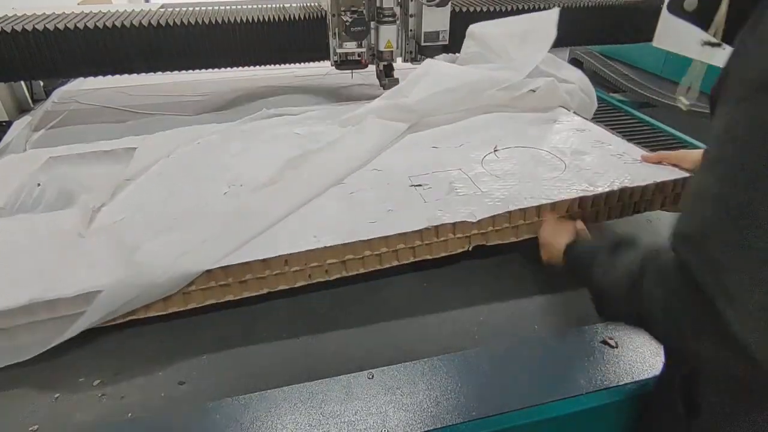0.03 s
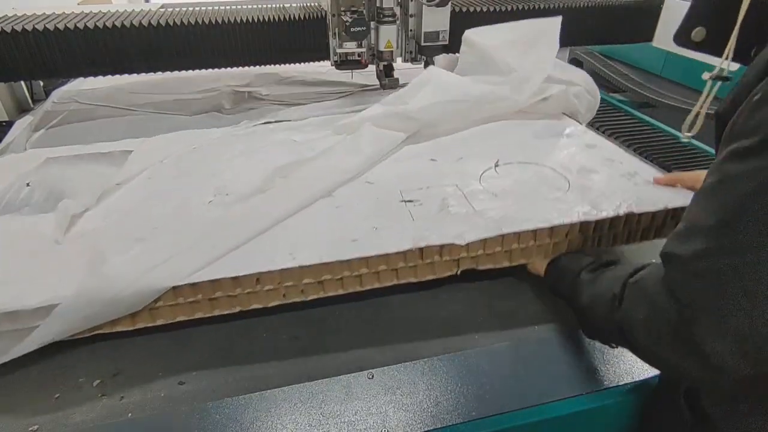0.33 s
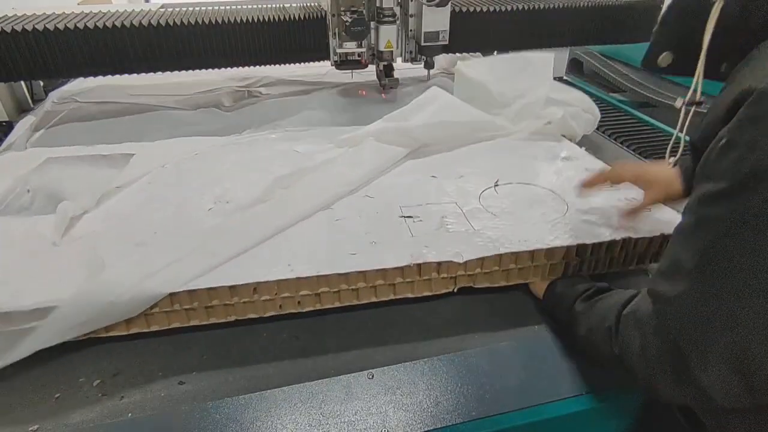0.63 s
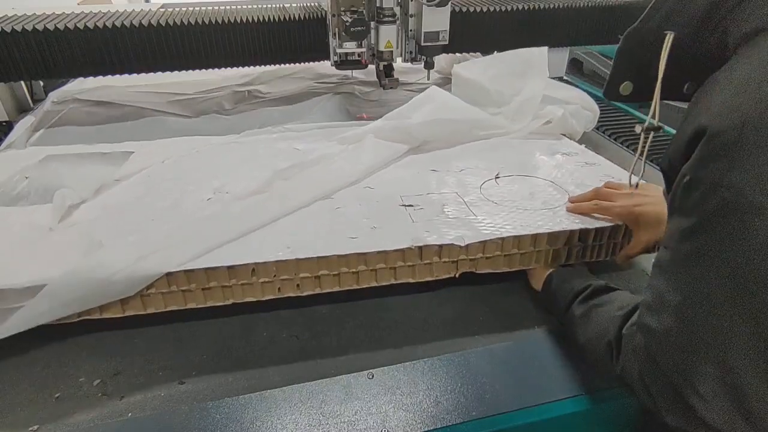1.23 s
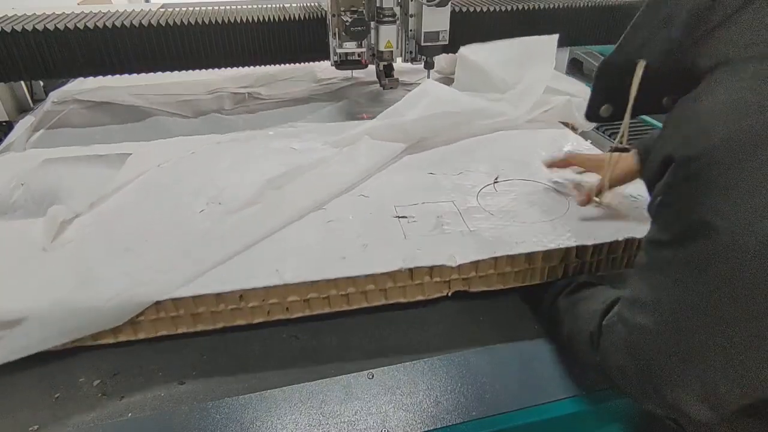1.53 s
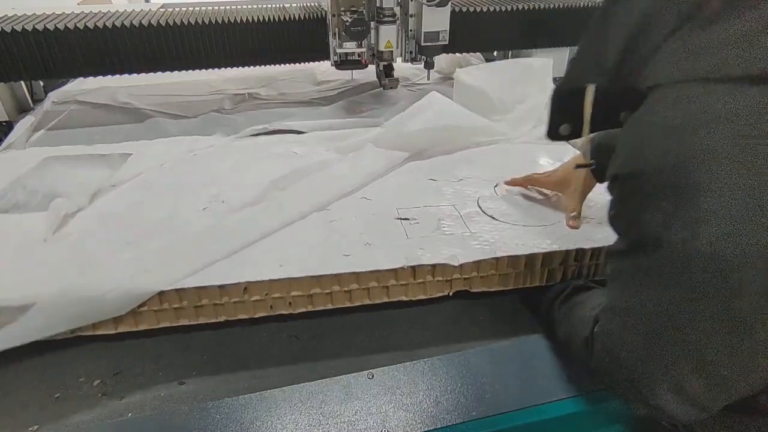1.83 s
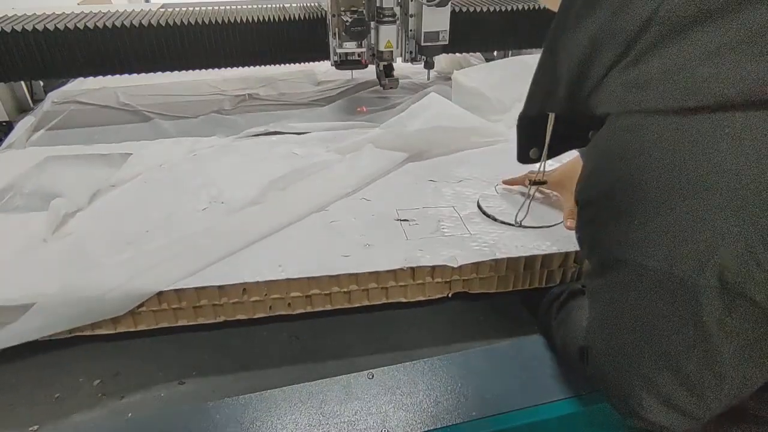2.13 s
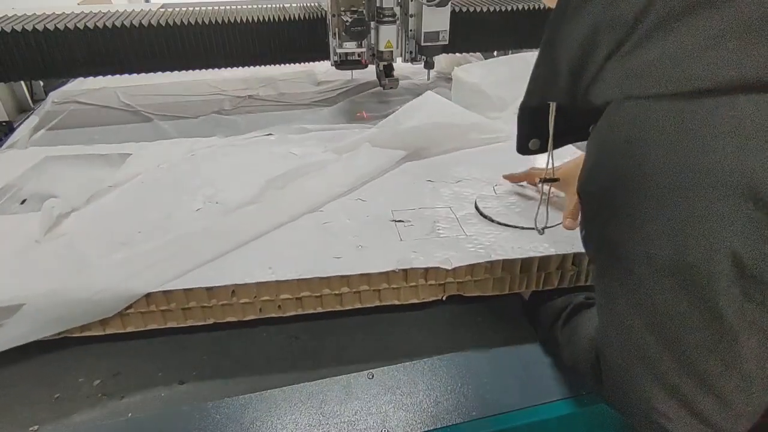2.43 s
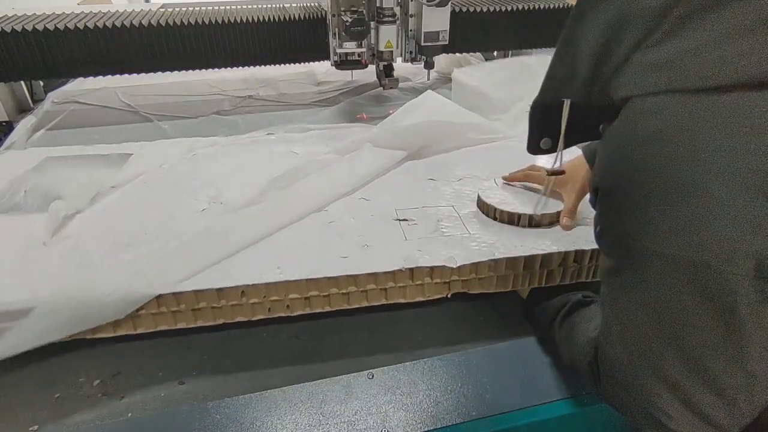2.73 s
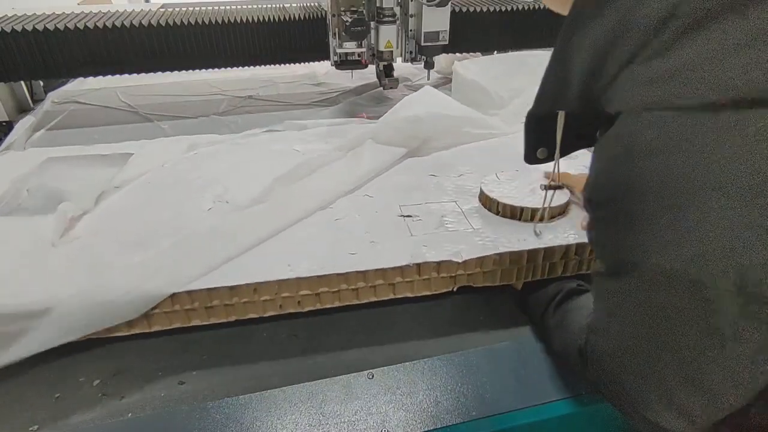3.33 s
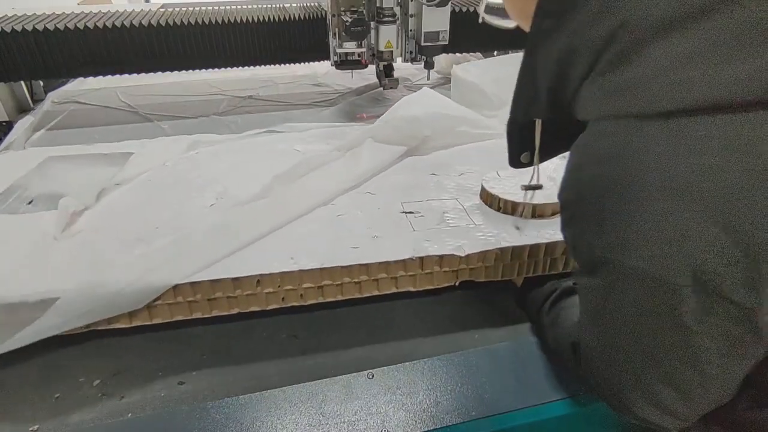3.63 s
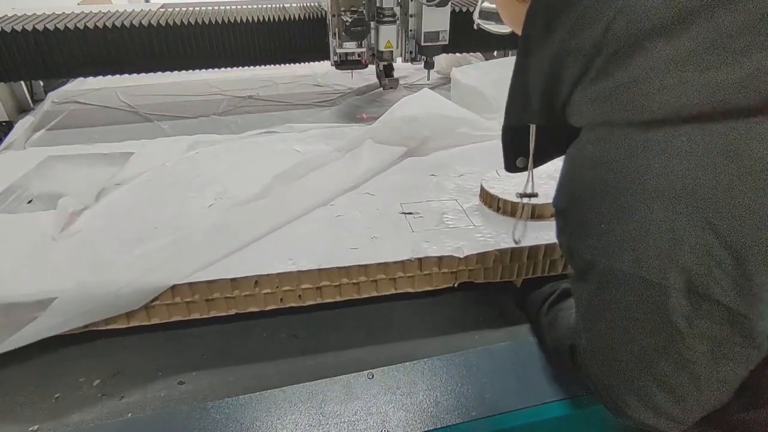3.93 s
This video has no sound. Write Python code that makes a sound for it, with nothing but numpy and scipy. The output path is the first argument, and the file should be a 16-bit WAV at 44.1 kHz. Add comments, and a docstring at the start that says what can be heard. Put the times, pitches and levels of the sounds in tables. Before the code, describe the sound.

Thick cardboard is handled and scraped over a steady blower drone in a workshop. For the first 1.5 seconds the sheet scuffs and rubs while thin film and sleeves rustle, followed by soft hollow bumps. A cut disc scrapes in its hole with dry snaps at about 1.9 seconds, then again at 2.5 with the sharpest crack. Light rustling continues, with a weaker scrape and tick near 3.7 seconds.

```python
"""Workshop cutting table: a cut disc is pushed up out of a thick honeycomb cardboard sheet. A vacuum blower
drones steadily. The shifted sheet rubs, scuffs and booms under the hands; film and sleeves rustle, the sheet's
cut edge scuffs brightly. The disc's cut edge scrapes through its hole in short stick-slip jerks, ringing the
paper cells, and the last fibres snap."""
import sys
import numpy as np
from scipy import signal
from scipy.fft import rfft, irfft, next_fast_len
from scipy.io import wavfile
from scipy.ndimage import uniform_filter1d

SR = 44100
rng = np.random.default_rng(int(sys.argv[2]) if len(sys.argv) > 2 else 0)


def transcribe(signal):
    """Save signal, clipped to [-1, 1], as a 16-bit WAV file at the path in sys.argv[1]."""
    frames = np.atleast_2d(signal).T
    limited = np.clip(frames, -1, 1)
    pcm = np.round(limited * 32767).astype(np.int16)
    wavfile.write(sys.argv[1], SR, pcm)


N = 176400

# blower air spectrum (frequency [Hz], relative density [dB])
BLOWER_SPECTRUM = [(20, -22), (36, -40), (52, -31), (78, -5), (98, -4), (125, 1.5), (185, 1), (290, -1),
                   (370, -7), (500, -6), (790, -5), (950, -12.5), (1250, -14), (1500, -19), (2100, -21.5),
                   (2800, -27.5), (5000, -29.5), (7000, -27.5), (10200, -32.5), (11500, -40), (14000, -90)]
# blower tones (frequency [Hz], level [dB])
BLOWER_TONES = [(187, -57.5), (297, -62), (473, -62)]
# sheet rubs on the table (start [s], attack [s], hold [s], release [s], level [dB], start pitch [Hz])
SHEET_RUBS = [(0.84, .005, .016, .01, -36, 645), (0.88, 0.0088, 0.013, 0.016, -45, 696),
              (1.403, 0.0044, 0.0024, 0.0024, -32.5, 702)]
# hands press the sheet (start [s], attack [s], hold [s], release [s], level [dB], boom [Hz])
SHEET_BUMPS = [(1.53, 0.035, 0.027, .02, -45.5, 187), (1.586, 0.022, 0.014, 0.015, -38, 122),
               (1.661, 0.024, 0.03, 0.0056, -42.5, 225), (1.667, .03, 0.027, 0.01, -39.5, 119),
               (1.87, 0.012, 0.018, 0.018, -46, 155), (2.14, 0.01, 0.12, 0.058, -44.5, 184)]
# sheet dragged or knocked (start [s], attack [s], hold [s], release [s], level [dB])
SHEET_DRAGS = [(0.287, .0073, 0.029, 0.075, -46.5), (0.395, 0.018, .04, .02, -57),
               (0.444, .002, .0055, 0.021, -43.5), (0.778, 0.023, 0.038, 0.018, -42),
               (0.863, .015, 0.032, 0.022, -44.5), (1.388, 0.026, 0.021, .03, -43.5),
               (1.846, .0025, .0064, 0.0051, -39.5), (2.498, 0.003, 0.016, 0.013, -45.5),
               (2.595, 0.0061, .008, 0.01, -41), (2.78, .003, 0.0036, 0.0092, -41),
               (3.671, 0.0056, 0.017, 0.018, -43.5)]
# drag spectrum (frequency [Hz], relative density [dB])
DRAG_SPECTRUM = [(150, -15.5), (350, -4), (550, 2), (780, 2), (1000, -10.5), (1350, -12), (2200, -18.5),
                 (4000, -44), (10000, -65)]
# film, hand and sleeve strokes (start [s], attack [s], hold [s], release [s], level [dB], treble [dB])
FILM_RUSTLES = [(0.012, 0.011, 0.011, 0.0091, -49, 25), (0, 0.0018, 0.3, 0.08, -52, 5.5),
                (0.136, 0.044, .02, 0.018, -56.5, 2), (0.35, 0.057, .012, 0.04, -49.5, 4),
                (0.527, 0.047, 0.041, 0.041, -54.5, 3), (0.665, 0.023, 0.32, 0.15, -61, 5),
                (1.335, 0.13, 0.11, 0.027, -44.5, 4.5), (1.697, 0.016, 0.041, 0.14, -48.5, 6.5),
                (2.103, 0.035, 0.38, .05, -59.5, 10), (2.693, 0.031, 0.04, 0.11, -53, 0),
                (2.915, 0.059, 0.12, 0.053, -55.5, 0.5), (3.169, 0.046, 0.26, 0.051, -56, 3.5),
                (3.65, 0.055, 0.017, 0.023, -50, 8)]
# single crinkles (time [s], level [dB])
FILM_CRINKLES = [(0.271, -53), (.415, -48.5), (1.136, -48), (2.023, -53), (2.126, -56.5), (3.061, -61),
                 (3.087, -47.5), (3.229, -52)]
# film spectrum (frequency [Hz], relative density [dB])
FILM_SPECTRUM = [(300, 6), (1000, 3), (2200, 7), (3500, 6), (5200, 1.5), (7000, 8.5), (10000, 5),
                 (11500, -5.5), (14000, -19.5)]
# bright scuffs of the sheet's cut edge (start [s], attack [s], hold [s], release [s], level [dB], centre [Hz],
# width [Hz])
SHEET_EDGE_SCUFFS = [(0.023, .005, 0.013, .011, -46, 6200, 1890)]
# uncut fibres breaking (time [s], level [dB])
FIBRE_SNAPS = [(1.846, -33), (1.856, -35), (1.8915, -32), (1.899, -36), (2.4975, -36), (2.5078, -23),
               (2.511, -27), (2.608, -35), (3.674, -35), (3.684, -40)]
# snap spectrum (frequency [Hz], relative density [dB])
SNAP_SPECTRUM = [(300, -10), (1200, 0), (3000, 0.5), (5000, -5.5), (7000, -1.5), (10000, 3), (12000, -6),
                 (14000, -5)]
# jerks of the disc (start [s], attack [s], hold [s], release [s], level [dB], treble [dB],
# cell pitch [ratio], cell ringing [dB])
DISC_JERKS = [(1.841, 0.0048, 0.0067, 0.0018, -33.5, -1, 1, -1),
              (1.88, .011, 0.0085, 0.028, -33, -2, 1.12, -8),
              (2.49, 0.0052, 0.027, 0.0066, -31.5, -2.5, 0.97, -6),
              (2.501, .002, 0.0055, 0.0044, -32, 20, 1, -5),
              (2.525, .0043, 0.039, 0.012, -35, -4, 0.99, -5),
              (2.56, 0.0028, 0.0045, 0.0048, -40.5, -1, 1.2, 1),
              (2.581, 0.022, 0.0084, 0.024, -34, -6, .99, -9),
              (3.63, .0063, 0.038, .012, -44.5, -6, 0.81, -19),
              (3.665, .0055, 0.0097, 0.01, -40, 0, 0.94, -13), (3.691, .006, 0.016, 0.074, -48, -13, 1, -7)]
# cut-edge friction spectrum (frequency [Hz], relative density [dB])
EDGE_SPECTRUM = [(150, -26), (500, -1.5), (1150, -2.5), (1500, -1.5), (2200, 3.5), (3300, -0.5), (4700, -4),
                 (5700, -1.5), (7100, 4), (8200, 9.5), (10000, 1.5), (11500, -13.5), (14000, -13.5)]
# paper cell wall modes (base frequency [Hz], width [Hz], relative gain [dB])
CELL_MODES = [(1080, 65, 5.5), (2104, 93, -6), (2320, 52, -7), (2830, 39, -3), (3180, 70, 7), (3320, 62, 9),
              (5530, 38, 6), (6300, 56, 13), (6540, 59, 14), (7160, 80, 6), (9600, 58, -8), (10740, 55, 11)]


def undb(db):
    """Decibels to gain."""
    return 10 ** (np.asarray(db) / 20)


def unit(x):
    """Scale to rms 1."""
    return x / np.sqrt(np.mean(x ** 2))


def shape(x, response):
    """Filter by a function of frequency."""
    size = next_fast_len(N + SR // 2)
    hz = np.arange(size // 2 + 1) * SR / size + 1e-6
    return irfft(rfft(x, size) * response(hz), size)[:N]


def colour(x, spectrum):
    """Filter by (Hz, dB) points; rms 1."""
    hz, db = np.array(spectrum).T
    return unit(shape(x, lambda f: undb(np.interp(np.log(f), np.log(hz), db))))


def resonance(f, hz, width_hz):
    """Response of one resonance, gain 1 at centre."""
    return 1 / (1 + 1j * (f * f - hz * hz) / (f * width_hz))


def ring(x, hz, width_hz):
    """Pass x through one resonance."""
    return shape(x, lambda f: resonance(f, hz, width_hz))


def walk(rate_hz):
    """Smooth random drift, rms 1."""
    span = max(int(SR / rate_hz), 2)
    return unit(uniform_filter1d(uniform_filter1d(rng.standard_normal(N), span), span))


def envelope(start_s, attack_s, hold_s, release_s):
    """Linear rise, hold, exponential fall."""
    t = np.arange(N) / SR - start_s
    return np.clip(t / attack_s, 0, 1) * np.exp(-np.maximum(t - attack_s - hold_s, 0) / release_s)


def grains(per_s, spread_db, hiss_db):
    """Random micro-slips of unequal size over friction hiss."""
    hits = rng.random(N) < per_s / SR
    size = np.minimum(rng.exponential(size=N), 4)
    clicks = hits * undb(spread_db * size) * rng.choice([-1, 1], N)
    return unit(unit(clicks) + undb(hiss_db) * rng.standard_normal(N))


def strokes(friction, table, shelf_hz=4460):
    """Gate friction into strokes, each with its own level and treble."""
    treble = shape(friction, lambda f: 1 / (1 + (shelf_hz / f) ** 4))
    return sum(envelope(*times) * undb(db) * unit(friction + (undb(treble_db) - 1) * treble)
               for *times, db, treble_db in table)


def blower(air_db=-43, flicker_db=1, waver_ratio=0.01824):
    """Steady rush of air with weak, wavering tones."""
    out = undb(air_db + flicker_db * walk(7.8)) * colour(rng.standard_normal(N), BLOWER_SPECTRUM)
    for hz, db in BLOWER_TONES:
        phase = 2 * np.pi * np.cumsum(hz * (1 + waver_ratio * walk(12.9))) / SR
        out += undb(db) * np.sqrt(2) * np.sin(phase)
    return out


def room(x, t60_s=0.25, onset_s=0.0068, tail_db=-7):
    """Direct sound plus the workshop's diffuse tail."""
    t = np.arange(SR) / SR
    tail = rng.standard_normal(SR) * np.exp(-np.log(1000) * t / t60_s) * (1 - np.exp(-t / onset_s))
    reverb = signal.fftconvolve(x, tail / np.linalg.norm(tail))[:N]
    return (x + undb(tail_db) * reverb) / np.hypot(1, undb(tail_db))


def film(crinkle_decay_s=0.0039):
    """Dense fine creasing in strokes, plus single crinkles."""
    creases = colour(grains(per_s=1400, spread_db=2, hiss_db=0), FILM_SPECTRUM)
    crinkles = sum(undb(db) * envelope(s, 0.0005, 0.0026, crinkle_decay_s) for s, db in FILM_CRINKLES)
    return strokes(creases, FILM_RUSTLES) + crinkles * colour(rng.standard_normal(N), FILM_SPECTRUM)


def sheet_edge():
    """Short, bright scuff of the sheet's cut edge."""
    friction = grains(per_s=1460, spread_db=1.8, hiss_db=-3)
    return sum(undb(db) * envelope(*times) * unit(ring(ring(friction, hz, width_hz), hz, width_hz))
               for *times, db, hz, width_hz in SHEET_EDGE_SCUFFS)


def sheet_rubs(jitter_ratio=0.039, rise_per_s=9.5, overtone_db=-23, grit_db=-18):
    """Stick-slip on the table: rough, rising groans."""
    t, out = np.arange(N) / SR, 0
    jitter = 1 + jitter_ratio * walk(500)
    friction = grains(per_s=440, spread_db=1.1, hiss_db=-1)
    grit = undb(grit_db) * unit(ring(ring(friction, 660, 650), 730, 1000))
    for start_s, attack_s, hold_s, release_s, db, hz in SHEET_RUBS:
        rise = 1 + rise_per_s * np.clip(t - start_s, 0, attack_s + hold_s)
        phase = 2 * np.pi * np.cumsum(hz * jitter * rise) / SR
        groan = np.sqrt(2) * (np.sin(phase) + undb(overtone_db) * np.sin(2 * phase))
        out += undb(db) * envelope(start_s, attack_s, hold_s, release_s) * unit(groan + grit)
    return out


def sheet_scuffs(boom_width_ratio=0.46):
    """The sheet scuffs hollowly as it slides and booms under the hands."""
    scuff = grains(per_s=900, spread_db=3.2, hiss_db=-5)
    out = colour(scuff, DRAG_SPECTRUM) * sum(undb(db) * envelope(*times) for *times, db in SHEET_DRAGS)
    for *times, db, hz in SHEET_BUMPS:
        boom = unit(shape(scuff, lambda f: resonance(f, hz, boom_width_ratio * hz) ** 2))
        out += undb(db) * envelope(*times) * boom
    return out


def fibres(decay_s=0.0021):
    """Fibres still holding the disc break with dry ticks."""
    crack = colour(rng.standard_normal(N), SNAP_SPECTRUM)
    return crack * sum(undb(db) * envelope(s, 0.0002, 0.0005, decay_s) for s, db in FIBRE_SNAPS)


def disc(scatter_decay_s=0.00103):
    """The cut edge catches and slips; slips scatter through the honeycomb and ring its cells."""
    core = rfft(rng.standard_normal(N) * np.exp(-np.arange(N) / SR / scatter_decay_s))
    slips = grains(per_s=1300, spread_db=1.5, hiss_db=-10.5)
    scattered = irfft(rfft(slips) * core / np.abs(core), N)  # all-pass: time smear only
    edge, out = colour(scattered, EDGE_SPECTRUM), 0
    for *stroke, pitch_ratio, ring_db in DISC_JERKS:
        scrape = shape(edge, lambda f: 1 + sum(undb(db + ring_db) * resonance(f, hz * pitch_ratio, width)
                                               for hz, width, db in CELL_MODES))
        out += strokes(scrape, [stroke])
    return out


def scene():
    """Handling sounds in the room, over the blower; mono."""
    handling = disc() + fibres() + film() + sheet_edge() + sheet_rubs() + sheet_scuffs()
    return (room(handling) + blower())[None]


def record(dry, notch_hz=8560, notch_width_hz=800, notch_db=-22.5, cutoff_hz=13900):
    """Microphone: treble notch, steep low-pass."""
    notched = shape(dry[0], lambda f: undb(notch_db * np.exp(-((f - notch_hz) / notch_width_hz) ** 2)))
    lowpass = signal.ellip(12, 0.2, 80, cutoff_hz, fs=SR, output="sos")
    return signal.sosfilt(lowpass, notched)[None]


dry = scene()
out = record(dry)
transcribe(out)
```